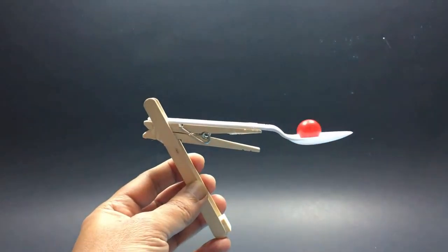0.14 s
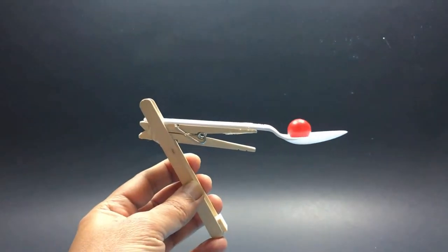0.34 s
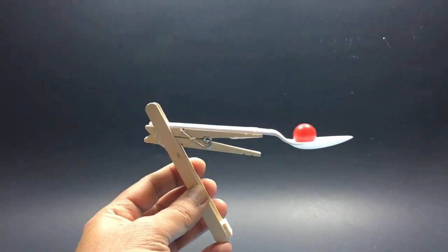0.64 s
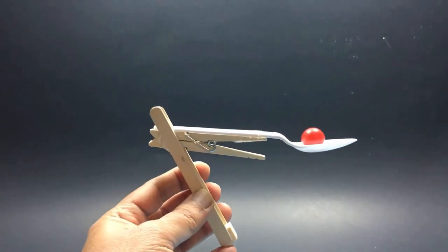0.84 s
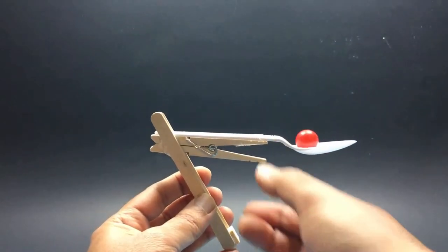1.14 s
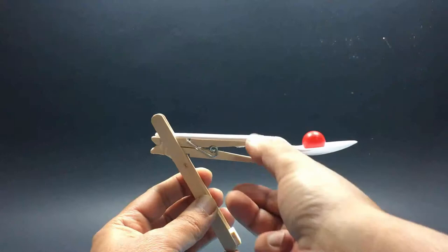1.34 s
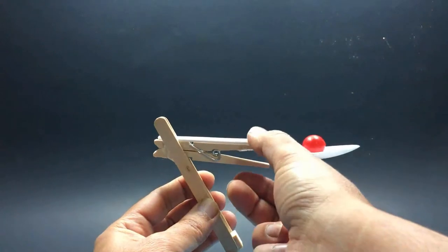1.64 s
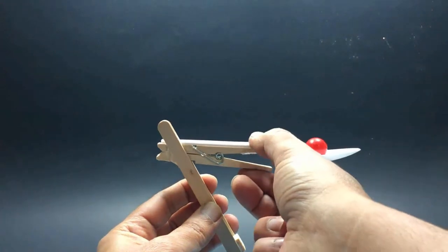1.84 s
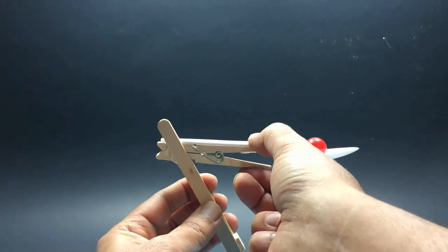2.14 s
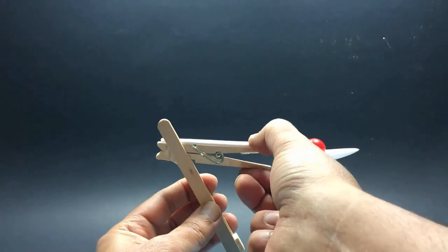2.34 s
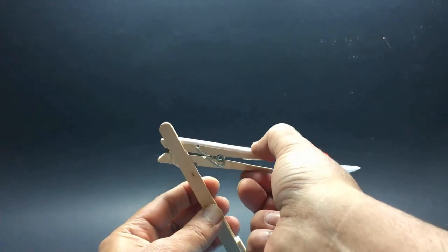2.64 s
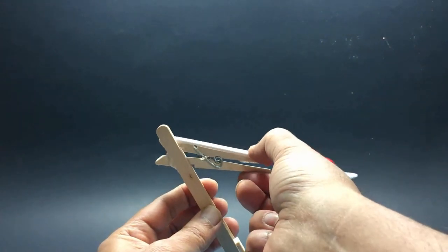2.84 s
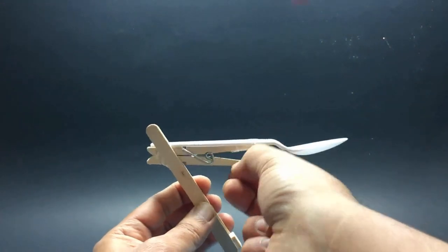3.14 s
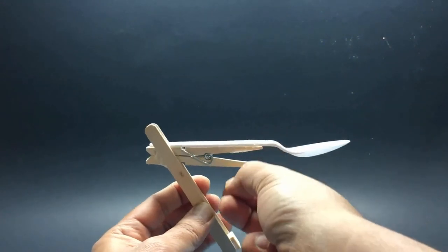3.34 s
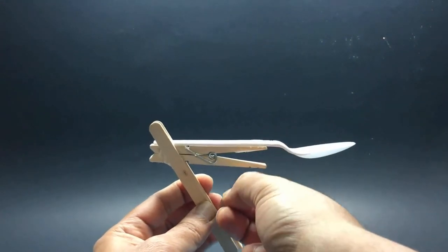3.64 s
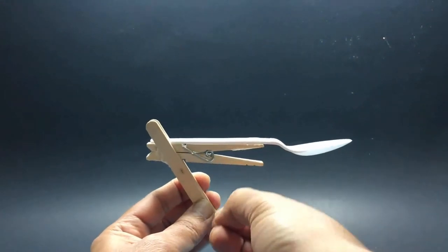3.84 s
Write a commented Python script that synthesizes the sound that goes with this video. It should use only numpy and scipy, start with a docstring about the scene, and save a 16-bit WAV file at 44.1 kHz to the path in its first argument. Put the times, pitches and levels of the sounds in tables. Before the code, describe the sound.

A wooden clothespin catapult snaps shut sharply after faint close ticks and finger rubs. Its small ball knocks on a panel across the room, then lands on a table and bounces once, over a low room rumble.

```python
"""Over a low room rumble, heard throughout, a clothespin catapult with a plastic spoon is handled nearby.
Spring and wood tick, the stick shifts in the grip, and fingers rub: band-shaped noise and damped modes.
The peg then snaps shut in a burst of bright claps, and the spoon quivers as one damped oscillator.
The ball knocks on a far panel, lands on the table and bounces once: contact noise, then board modes."""
import sys
import numpy as np
from scipy import signal
from scipy.fft import rfft, irfft, next_fast_len
from scipy.io import wavfile
from scipy.ndimage import uniform_filter1d, map_coordinates

SR = 44100
rng = np.random.default_rng(int(sys.argv[2]) if len(sys.argv) > 2 else 0)


def generate_wav(sig):
    """Save sig (samples, or channels by samples) to the path in sys.argv[1] as 16-bit PCM at SR."""
    pcm = np.round(np.clip(np.atleast_2d(sig).T, -1, 1) * 32767).astype(np.int16)
    wavfile.write(sys.argv[1], SR, pcm)


N = 176400
T = np.arange(SR * 3 // 4) / SR  # time axis of one event, s

# spectrum of the room rumble and hiss [f/Hz, level/dB]
RUMBLE_SPECTRUM = [(15, -52), (25, -27.5), (40, -14), (58, -4.5), (85, -3.5), (115, -4), (145, -13.5),
                   (175, -10.5), (240, -22), (340, -21), (430, -34), (700, -35), (1300, -38), (2200, -40.5),
                   (3000, -44.5), (9000, -48.5), (12000, -51.5), (15000, -62), (16500, -74.5)]
RUMBLE_DB = -62.5  # rms
HUM_HZ, HUM_DB, HUM_WAVER = 112.3, -69, 0.881  # f/Hz, rms level/dB, random share relative to steady part

# decay time of the diffuse room field [f/Hz, t60/s]
ROOM_DECAY = [(100, 0.6), (300, 0.31), (700, 0.288), (1800, 0.2538), (5000, 0.2483), (13000, 0.231)]
# spectrum of the room field [f/Hz, level/dB]
ROOM_SPECTRUM = [(100, 1.5), (400, 3.5), (1100, 0.5), (2500, 1), (6000, -2), (10000, -4.5), (16000, -8.5)]
ROOM_RISE_S, LATE_DB, LATE_T60 = 0.00099, -28, 0.29  # onset/s; lingering part: level/dB, t60/s

# small ticks of wood, spring and ball [t/s, level/dB, centre f/Hz, wire ring level/dB]
SMALL_TICKS = [(0.0493, -40.5, 5470, -34), (0.0629, -46.5, 12500, -28.5), (2.594, -58.5, 7500, -22.5),
               (2.656, -58.5, 1980, -19), (2.704, -51.5, 1923, -4), (2.714, -68.5, 1600, -19),
               (3.16, -58, 6980, -10), (3.181, -40, 1129, -29.5), (3.745, -49, 3946, -38.5),
               (3.756, -41.5, 1690, -37.5)]
TICK_T60, TICK_OCTAVES, TICK_ROOM_DB = 0.01557, 0.793, -17.5  # t60/s, centre to -3 dB/octaves, level/dB
# modes of the spring wire [f/Hz, level/dB, t60/s]
WIRE_MODES = [(6830, -5, 0.07), (7010, -7.5, .06), (11570, -6, .045)]
BUMP_S, BUMP_DB, BUMP_T60 = 0.0545, -45.5, 0.102  # stick shifting in the grip: t/s, level/dB, t60/s
# spectrum of that shift [f/Hz, level/dB]
BUMP_SPECTRUM = [(30, -6), (90, 0), (280, -7), (500, -10), (900, -9), (1400, -18.5), (5000, -50)]
# finger rubs [t/s, length/s, level/dB, centre f/Hz]
FINGER_RUBS = [(0.235, 0.0963, -71, 1150), (0.447, 0.297, -80.5, 5900), (0.608, 0.168, -75, 5940),
               (0.727, 0.1095, -72, 14400), (1.228, 0.131, -75.5, 1200), (2.217, 0.081, -72, 1530),
               (2.63, 0.049, -79.5, 1390), (3.328, 0.37, -71, 7027)]
RUB_GRAIN_DB = 2.5  # rms depth, as skin catches and slips
RUB_ATTACK_SHARE, RUB_OCTAVES = 0.132, 1.085  # part of a stroke spent rising; centre to -3 dB/octaves

# contacts of the closing peg [t/s, level/dB]
PEG_CONTACTS = [(3.1769, -38.5), (3.181, -25.5), (3.1836, -12.5), (3.1848, -13.5)]
# spectrum of a closing contact [f/Hz, level/dB]
SNAP_SPECTRUM = [(100, -23.5), (350, -18), (650, -26.5), (1000, -19), (1700, -16), (2500, -10),
                 (3600, -9.5), (4900, 0), (5600, -1), (6300, -8), (8500, -9.5), (9700, -4), (13000, -7),
                 (16000, -19.5)]
SNAP_T60, SNAP_BODY_DB, SNAP_BODY_T60, SNAP_ROOM_DB = 0.0067, -15.5, 0.084, -26  # t60/s, levels/dB
# modes of the peg [f/Hz, level/dB, t60/s]
PEG_MODES = [(2890, -20, .09), (3850, -4.5, .07), (4240, -8.5, 0.05), (5540, 4.5, 0.077), (5520, -0.5, .08),
             (8900, 1.5, .05), (11770, -14.5, .05), (12700, 1.5, 0.057)]
PEG_DB = -34
# spectrum of the faint airy tail of the snap [f/Hz, level/dB]
AIR_SPECTRUM = [(300, 4.5), (1200, 3.5), (3000, 0.5), (6000, -6.5), (11000, -13), (16000, -10.5)]
AIR_DB, AIR_T60 = -56, 2  # level/dB, t60/s
# spoon: t/s, f/Hz, level/dB, t60/s, rise/s
QUIVER_S, QUIVER_HZ, QUIVER_DB, QUIVER_T60, QUIVER_RISE_S = 3.189, 66.3, -29.5, 0.11, 0.0167

# far knock: t/s, then level/dB of each part
KNOCK_S, KNOCK_CONTACT_DB, KNOCK_CLATTER_DB, KNOCK_ROOM_DB = 3.4204, -12, -23, -31
KNOCK_RING_DB, KNOCK_BOOM_DB = -31, -39
KNOCK_CONTACT_T60, KNOCK_CLATTER_T60 = 0.0127, 0.07  # s
KNOCK_BOOM_T60, KNOCK_BOOM_HZ = 0.3034, 218.5
KNOCK_RATTLE_DB = 2  # rms depth of the flutter in the decay
KNOCK_ECHO_S, KNOCK_ECHO_DB = 0.0032, -6.5  # a wall beside the panel: delay/s, level re contact/dB
# spectrum of the ball's contact with the panel [f/Hz, level/dB]
KNOCK_CONTACT_SPECTRUM = [(100, -21), (700, -15), (1300, -1.5), (2200, -1), (3100, -1), (3700, -1),
                          (4200, 7.5), (4900, -23.5), (5800, -14), (7500, -25.5), (12000, -29),
                          (16000, -37.5)]
# spectrum of the panel's clatter and of the wall echo [f/Hz, level/dB]
KNOCK_SPECTRUM = [(50, -27.5), (120, -3.5), (380, -7.5), (550, -12), (800, -5), (1300, -4.5), (2400, 1.5),
                  (3200, -1), (4200, -5.5), (5200, -12.5), (7500, -24.5), (11500, -39.5), (16000, -47.5)]
# modes of the panel [f/Hz, level/dB, t60/s]
PANEL_MODES = [(138.6, -13, 0.35), (273.8, -8.5, 0.21), (1306, -21.5, 0.057), (2111.5, -2.5, 0.16),
               (2429.3, 7, 0.074), (2988.6, 4.5, 0.04), (3308, -3, 0.16), (4244, -13, 0.14)]
MODE_SPACING_HZ, MODE_SCATTER_DB = 95.417, 2  # the many weak modes of a board

# ball on the table [t/s, contact level/dB, clatter level/dB, clatter t60/s, swell of the wood/s,
# room level/dB, ring level/dB, treble shelf/dB]
TABLE_IMPACTS = [(3.7673, -7, -14, 0.0661, 0.00233, -24.5, -20.5, 9),
                 (3.8868, -11.5, -22, 0.0322, 0.000334, -36.5, -30.5, -1.5)]
# spectrum of the ball's contact with the table [f/Hz, level/dB]
CONTACT_SPECTRUM = [(40, -40), (150, -15), (500, -6.5), (1500, -6.5), (3500, 5), (6000, 5), (9000, -6),
                    (13000, -8), (16000, -8)]
# spectrum of the table's clatter, before the treble shelf [f/Hz, level/dB]
CLATTER_SPECTRUM = [(40, -25), (100, -8.5), (190, -8), (280, -7.5), (390, -3.5), (500, -8.5), (600, -8.5),
                    (720, -7), (930, -5.5), (1120, -2.5), (1450, 3.5), (2200, -.5), (3300, -2),
                    (4400, -2.5), (5100, -4.5), (5800, -0.5), (7500, -13), (12000, -19.5), (16000, -36.5)]
# modes of the table top [f/Hz, level/dB, t60/s]
TABLE_MODES = [(266, -18, .28), (375, -3, .06), (694, -17, .26), (1098, 3, .06), (1131, -1.5, .16),
               (1282, -6, .12), (1537, -9, .17), (1793, -11, .12), (2026, 0, .09), (2183, -8, .11),
               (2401, -15, .2), (2560, -11, .12), (2668, -9, .11), (3020, -11, .14), (4242, -15, .14),
               (4615, -13, .13), (5425, -11, .11), (5705, -15, .13)]
CONTACT_T60, TREBLE_HZ = 0.00214, 6500  # t60/s, middle of the treble shelf f/Hz

TOP_HZ = 15900  # upper band limit


def amp(db):
    """Level definition: amplitude ratio is ten to the level over twenty."""
    return 10 ** (np.asarray(db) / 20)


def unit(x):
    """Normalisation by mean power: scale to rms 1."""
    return x / np.sqrt(np.mean(x ** 2) + 1e-20)


def along(points, hz):
    """Logarithmic frequency scale: interpolate (f/Hz, value) points on it."""
    f, v = np.transpose(points)
    return np.interp(np.log(hz + 1), np.log(f + 1), v)


def add(out, s, x):
    """Linear superposition: add x into the mixture from time s."""
    i = round(s * SR)
    out[i:i + len(x)] += x[:N - i]


def coloured(x, shape_db):
    """Minimum-phase filtering: a causal response of unit power gain; shape_db is a function of Hz."""
    m = 2 * next_fast_len(len(x) // 2 + SR // 10)
    gain = unit(amp(shape_db(np.fft.rfftfreq(m, 1 / SR))))
    cepstrum = irfft(np.log(np.maximum(gain, 1e-6)))
    # folding the cepstrum onto positive time gives minimum phase
    cepstrum[1:m // 2] *= 2
    cepstrum[m // 2 + 1:] = 0
    response = np.exp(rfft(cepstrum))
    return irfft(rfft(x, m) * response)[:len(x)]


def shaped(x, points):
    """Spectral shaping: colour x by (f/Hz, level/dB) points."""
    return coloured(x, lambda hz: along(points, hz))


def band(centre_hz, octaves):
    """Broad resonance: a hump 3 dB down at the given octaves from its centre."""
    return lambda hz: -10 * np.log10(1 + (np.log2((hz + 1) / centre_hz) / octaves) ** 4)


def decay_at(t, t60):
    """Exponential decay: the level falls 60 dB in t60."""
    return np.exp(-np.log(1000) * t / t60)


def fade(t60):
    """Exponential decay over one event."""
    return decay_at(T, t60)


def rise(seconds):
    """First-order relaxation: a soft onset with this time constant."""
    return 1 - np.exp(-T / seconds)


def burst(t60):
    """Dense transient vibration: decaying noise whose total energy is fixed by its t60."""
    x = rng.standard_normal(len(T)) * fade(t60)
    return x * np.linalg.norm(fade(t60)) / np.linalg.norm(x)


def ring(modes, scatter_db=0.55):
    """Modal superposition: damped sinusoids, struck a little differently each time."""
    out = np.zeros(len(T))
    for hz, db, t60 in modes:
        level = amp(db + scatter_db * rng.normal())
        out += level * fade(t60) * np.sin(2 * np.pi * (hz * T + rng.random()))
    return out


def room():
    """Diffuse reverberation: a fresh noise tail whose treble dies first while a weak late part lingers."""
    hz, t, z = signal.stft(rng.standard_normal(len(T)), SR, nperseg=256)
    early = decay_at(t, along(ROOM_DECAY, hz)[:, None])
    late = amp(LATE_DB + band(1200, octaves=2.2)(hz))[:, None] * decay_at(t, LATE_T60)
    colour = amp(along(ROOM_SPECTRUM, hz))[:, None]
    tail = signal.istft(z * np.hypot(early, late) * colour, SR)[1]
    return tail[:len(T)] * rise(ROOM_RISE_S)


def background(rate=7):
    """Stationary noise plus a narrow-band hum: rumble, faint hiss and slow random modulation."""
    rumble = shaped(rng.standard_normal(N + SR), RUMBLE_SPECTRUM)[SR:]
    t = np.arange(N) / SR
    # two smooth random curves, with rate points a second
    knots = int(N * rate / SR) + 4
    a, b = [map_coordinates(rng.standard_normal(knots), [t * rate]) for _ in range(2)]
    waver = 1 + HUM_WAVER * (a + 1j * b)
    hum = np.real(waver * np.exp(2j * np.pi * HUM_HZ * t))
    return amp(RUMBLE_DB) * unit(rumble) + amp(HUM_DB) * unit(hum)


def ticks():
    """Impulsive excitation: short coloured bursts of wood, spring and ball, with the wire's modes."""
    out = np.zeros(N)
    for s, db, hz, wire_db in SMALL_TICKS:
        tick = coloured(burst(TICK_T60) + amp(TICK_ROOM_DB) * room(), band(hz, TICK_OCTAVES))
        add(out, s, amp(db) * (tick + amp(wire_db) * ring(WIRE_MODES)))
    return out


def grip_shift():
    """Low-frequency transient: the stick shifts in the grip with a dull decaying burst."""
    out = np.zeros(N)
    bump = burst(BUMP_T60) + amp(-12) * room()
    add(out, BUMP_S, amp(BUMP_DB) * shaped(bump, BUMP_SPECTRUM))
    return out


def rubs():
    """Sliding friction: skin on wood makes band noise, its level grained as skin catches and slips."""
    out = np.zeros(N)
    for s, length, db, hz in FINGER_RUBS:
        stroke = np.interp(np.linspace(0, 1, int(length * SR)), [0, RUB_ATTACK_SHARE, 1], [0, 1, 0])
        grain = unit(uniform_filter1d(rng.standard_normal(len(stroke)), size=130))
        stroke = stroke * amp(RUB_GRAIN_DB * grain)
        noise = coloured(rng.standard_normal(len(stroke)), band(hz, RUB_OCTAVES))
        add(out, s, amp(db) * stroke * noise)
    return out


def snap():
    """Release of elastic energy: the peg slips off the thumb and claps shut in several contacts."""
    out = np.zeros(N)
    for s, db in PEG_CONTACTS:
        body = amp(SNAP_BODY_DB) * burst(SNAP_BODY_T60)
        clap = shaped(burst(SNAP_T60) + body + amp(SNAP_ROOM_DB) * room(), SNAP_SPECTRUM)
        air = amp(AIR_DB) * shaped(burst(AIR_T60), AIR_SPECTRUM)
        add(out, s, amp(db) * (clap + amp(PEG_DB) * ring(PEG_MODES) + air))
    return out


def spoon_quiver():
    """Free damped oscillation: the spoon swings on at one low frequency."""
    out = np.zeros(N)
    envelope = rise(QUIVER_RISE_S) ** 2 * fade(QUIVER_T60)
    add(out, QUIVER_S, amp(QUIVER_DB) * envelope * np.sin(2 * np.pi * QUIVER_HZ * T))
    return out


def board(count=260):
    """High modal density: the undamped sum of a board's many weak modes, rms 1."""
    hz = MODE_SPACING_HZ * (np.arange(count) + rng.random(count))
    phases = np.exp(2j * np.pi * rng.random(count))
    lines = np.zeros(SR // 2 + 1, complex)  # 1 Hz bins
    lines[np.minimum(hz.astype(int), SR // 2)] = amp(MODE_SCATTER_DB * rng.standard_normal(count)) * phases
    return unit(irfft(lines)[:len(T)])


def rattle(depth_db):
    """Random amplitude modulation: a gain that flutters every few milliseconds."""
    flutter = unit(uniform_filter1d(rng.standard_normal(len(T)), size=150))
    return unit(amp(depth_db * flutter))


def far_knock():
    """Impact on a panel across the room: a doubled clack, a rattling modal decay and a hollow boom."""
    out = np.zeros(N)
    contact = amp(KNOCK_CONTACT_DB) * shaped(burst(KNOCK_CONTACT_T60), KNOCK_CONTACT_SPECTRUM)
    clatter = amp(KNOCK_CLATTER_DB) * fade(KNOCK_CLATTER_T60) * board()
    body = shaped(clatter + amp(KNOCK_ROOM_DB) * room(), KNOCK_SPECTRUM) * rattle(KNOCK_RATTLE_DB)
    hump = band(KNOCK_BOOM_HZ, octaves=1.1)
    # doubling the dB curve steepens the hump
    boom = coloured(burst(KNOCK_BOOM_T60) * rise(ROOM_RISE_S), lambda hz: 2 * hump(hz))
    boom = amp(KNOCK_BOOM_DB) * boom
    panel = amp(KNOCK_RING_DB) * ring(PANEL_MODES)
    add(out, KNOCK_S, rise(0.00063) * (contact + body + boom + panel))
    echo = shaped(burst(KNOCK_CONTACT_T60), KNOCK_SPECTRUM)
    add(out, KNOCK_S + KNOCK_ECHO_S, amp(KNOCK_CONTACT_DB + KNOCK_ECHO_DB) * echo)
    return out


def click(t60):
    """Contact impulse: one hard push with a short spray, each given the same energy."""
    push = np.linalg.norm(fade(t60)) * signal.unit_impulse(len(T), idx=5)
    return (push + burst(t60)) / np.sqrt(2)


def ball_on_table():
    """Impact and modal response: a bright contact at landing and bounce, then the wood swells and rings."""
    out, top = np.zeros(N), board()
    for s, contact_db, clatter_db, t60, swell_s, room_db, ring_db, treble_db in TABLE_IMPACTS:
        def clatter_shape(hz):
            """Shelving: the treble level is reached over half an octave."""
            shelf = np.clip(np.log2((hz + 1) / TREBLE_HZ) * 2 + 0.5, 0, 1)
            return along(CLATTER_SPECTRUM, hz) + treble_db * shelf

        contact = amp(contact_db) * shaped(click(CONTACT_T60), CONTACT_SPECTRUM)
        clatter = amp(clatter_db) * rise(swell_s) * fade(t60) * top
        body = coloured(clatter + amp(room_db) * room(), clatter_shape)
        add(out, s, contact + body + amp(ring_db) * rise(swell_s) * ring(TABLE_MODES))
    return out


def scene():
    """Superposition of all sources at one microphone."""
    handling = ticks() + grip_shift() + rubs()
    release = snap() + spoon_quiver()
    return (background() + handling + release + far_knock() + ball_on_table())[None]


def record(dry):
    """Band limitation: a steep elliptic low-pass suppresses what lies above TOP_HZ."""
    return signal.sosfilt(signal.ellip(10, 0.1, 80, TOP_HZ, fs=SR, output="sos"), dry)


dry = scene()
out = record(dry)
generate_wav(out)
```